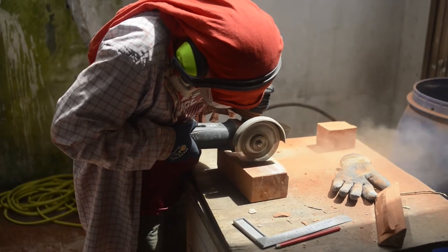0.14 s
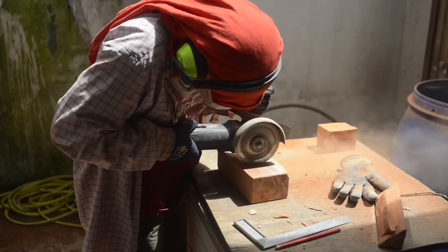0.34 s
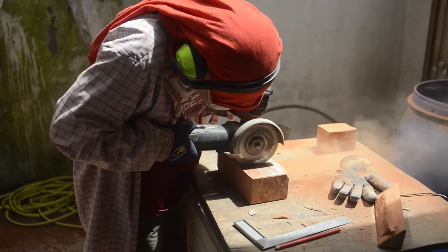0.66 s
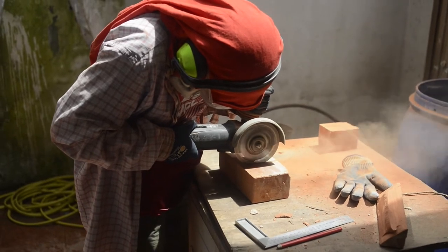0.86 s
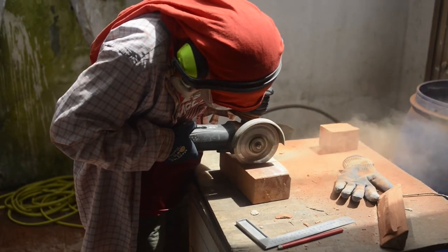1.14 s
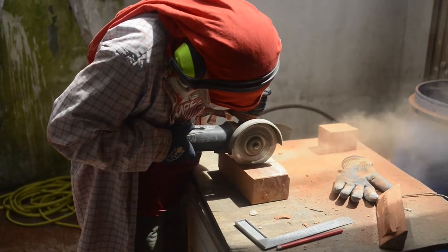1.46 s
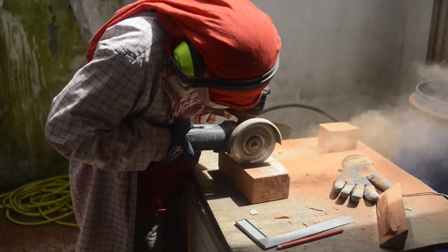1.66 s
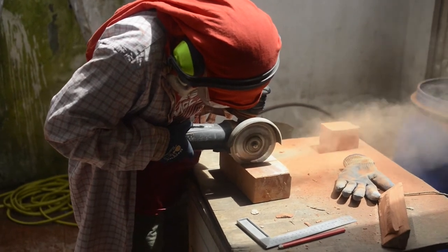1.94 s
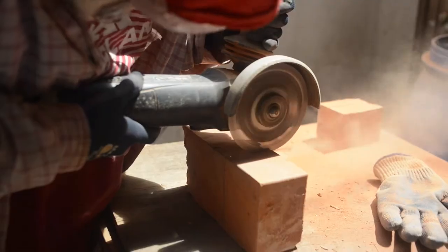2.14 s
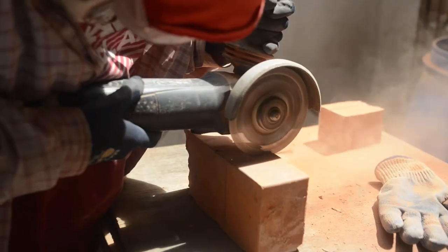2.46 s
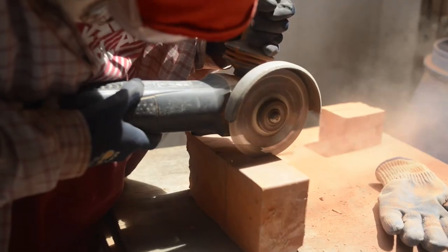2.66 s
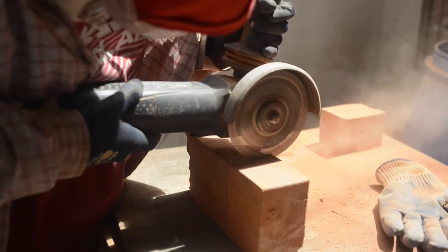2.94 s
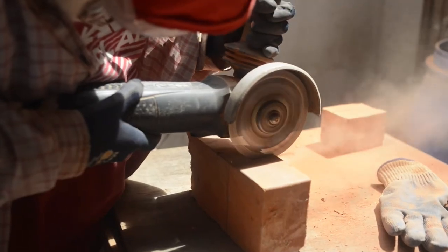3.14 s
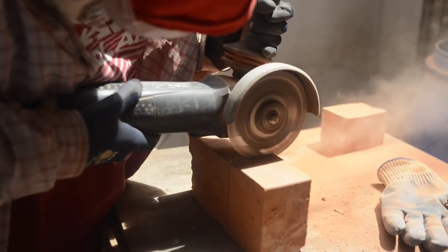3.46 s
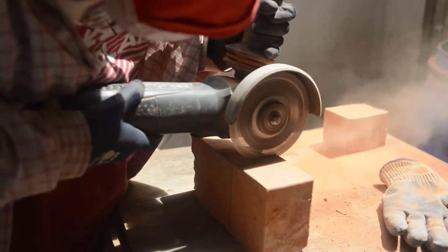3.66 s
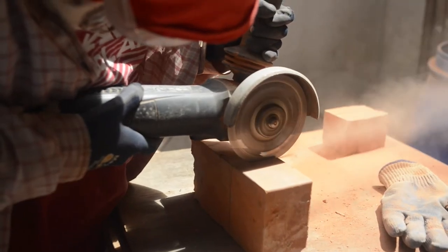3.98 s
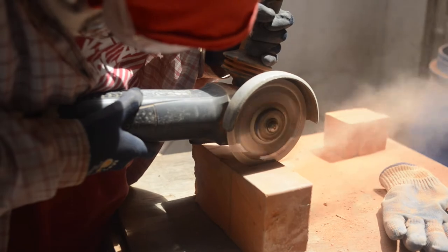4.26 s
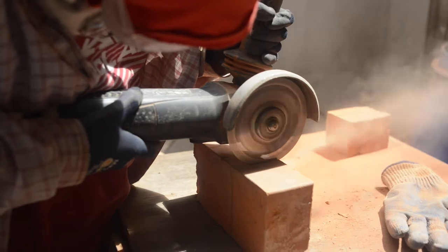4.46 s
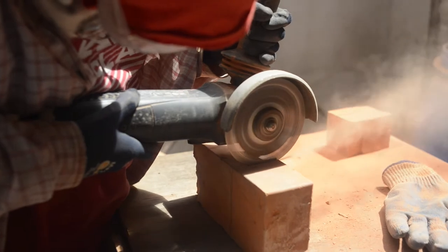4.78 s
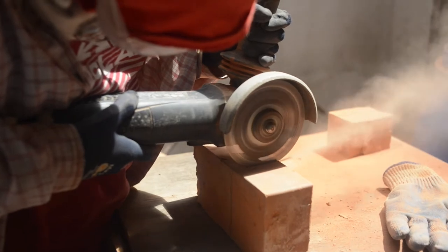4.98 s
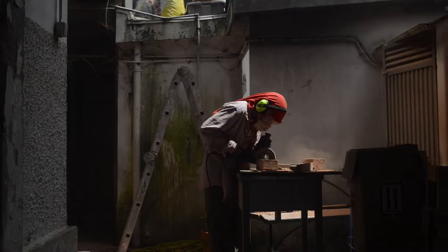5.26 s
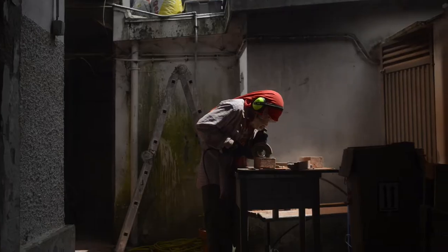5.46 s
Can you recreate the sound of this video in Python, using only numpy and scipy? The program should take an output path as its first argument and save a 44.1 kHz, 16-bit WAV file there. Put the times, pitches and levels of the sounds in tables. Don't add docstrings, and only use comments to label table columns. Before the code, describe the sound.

Continuous pulsing high screech of a spinning disc grinding into brick, dusty hiss around it, its tone changing abruptly at two scene cuts.

```python
import sys
import numpy as np
from scipy import signal
from scipy.fft import rfft, irfft
from scipy.io import wavfile
from scipy.ndimage import uniform_filter1d

SR = 44100
rng = np.random.default_rng(int(sys.argv[2]) if len(sys.argv) > 2 else 0)


def generate_wav(sig):
    pcm = np.round(np.clip(np.atleast_2d(sig).T, -1, 1) * 32767).astype(np.int16)
    wavfile.write(sys.argv[1], SR, pcm)


def elevation(decibels):
    levels = np.asarray(decibels, float)
    return 10 ** (levels / 20)


N = 247779

MOVES_S = (2.104, 5.143)
SPINDLE_HZ, MAINS_HZ = 145.33, 50

MODE_HZ = [3420, 3760, 3905, 4500, 5240, 5360, 5860, 6110, 6210, 6760, 7020, 7260, 7460, 7600, 7975, 8030,
           8185, 9130, 9435, 10660, 11300, 12020, 12750, 13100, 13380, 14080, 14600, 15400]
MODE_WIDTH_HZ = [177, 72, 45, 89, 70, 71, 60, 80, 68.6, 33.4, 35, 130, 80, 70, 45.4, 50, 52, 45, 39.7, 254,
                 230, 90, 169, 55, 90, 79, 110, 60]
# beside_db, close_db, far_db [dB]
MODE_DB = [(4.5, -1.5, 2), (-5, 6, -7), (-1, -6, -1), (2.5, 7, 6), (-8, 1.5, -1), (4.5, 7, 4), (0, 0, 4),
           (3, -11, 2), (7.5, 11, 0), (4, 12, 3), (2, 3, -6), (1, -4, -11), (-4, -1, -6), (-13, -11, -10),
           (0, 9.5, 3), (0.5, 1, -9), (5, 10.5, 2), (-7, -8, -11), (11, 8, 2), (-4, -7.5, -16),
           (-3.5, -8.5, -10), (-7, -7.5, -7), (-10, -12, -12), (-10, -14, -9), (-16, -17, -16),
           (-11, -11, -15), (-18, -18, -23), (-14, -12, -15)]
THIN_MODE, TOP_MODE = 9, 18
# pitch_hz [Hz], level_db [dB per Hz]
DUST_SPECTRA = [
    [(1400, -48), (2650, -20), (2800, -5), (3360, -7.5), (4090, -9.5), (4300, -9), (4930, -13), (6000, -4),
     (8740, -7), (9980, -9), (11100, -18), (11800, -17), (13600, -22), (15600, -25)],
    [(1410, -41.5), (2400, -10.5), (3280, -5.5), (3750, -0.5), (4190, -42), (4460, 2.5), (4930, -4),
     (6540, -1.5), (8210, -3), (8740, -23), (9750, -7), (9980, -11), (15600, -21)],
    [(1400, -51), (2400, -23), (3000, -10), (3600, -6), (4190, -16), (4900, -24), (6400, -11.5),
     (7500, -12), (8700, -17), (10000, -13.5), (12500, -28), (15600, -31)],
]
# pitch_hz [Hz], level_db [dB per Hz]
BODY_SPECTRA = [
    [(15, -71), (25, -45), (96, -26), (211, -34.5), (242, -13), (273, -21.5), (577, -14.5), (612, -13.5),
     (703, -13), (1020, -9), (2300, -7), (2800, -8.5), (3640, -18), (6160, -120)],
    [(15, -57), (25, -40), (191, -21.5), (464, -20), (589, -14), (1020, -13), (1200, -9.5), (1520, -9.5),
     (1960, -3.5), (2490, -8), (2640, -3), (2800, -15.5), (3640, -23), (6160, -120)],
    [(15, -82), (25, -52), (108, -39.5), (134, -31), (464, -21.5), (589, -12), (731, -13), (964, -9.5),
     (1300, -7.5), (1460, -7), (1890, -8.5), (2800, -4.5), (3640, -26), (6160, -120)],
]
# pitch_hz [Hz], level_db [dB per Hz]
BENCH_SPECTRUM = [(30, -21), (60, -5), (110, -2.5), (250, 0), (480, -0.5), (900, -21), (2000, -61)]
# pitch_hz [Hz], level_db [dB]
MACHINE_TONES = [
    [(247.6, -77.5), (581.4, -73.5), (726.7, -71), (872.1, -74), (1017, -69.5), (1163, -72.5), (1502, -69),
     (1884, -65), (2164, -66), (2466, -92), (2649, -69), (2902, -57), (3047, -54), (3327, -58), (3472, -76),
     (3747, -58.5)],
    [(581.4, -75.5), (726.7, -74), (1507, -69.5), (2008, -68.5), (2169, -75), (2616, -61.5), (2751, -79),
     (2907, -69), (3052, -64), (3488, -56), (3623, -61), (3768, -73)],
    [(145.3, -82.5), (581, -72), (1502, -66), (2008, -65.5), (2320, -65), (2616, -60.5), (2762, -61),
     (2907, -61), (3198, -69), (3343, -70)],
]
# start_s [s], lift_db [dB]
HARD_LUMPS = [(0.601, 7.5), (0.6719, 4), (.85, 7), (1.2296, 4.5), (1.3164, 7), (1.5783, 8), (1.99, 0),
              (2.1261, 4.5), (2.386, 9), (2.542, 9), (2.6519, 8), (2.7927, 10), (2.8769, 6), (3.0285, 5.5),
              (3.1164, 7.5), (3.2221, 3), (3.301, 7), (3.3856, 8.5), (3.4486, 7), (3.7559, 1), (3.8192, 7),
              (4.0346, 6.5), (4.127, 8.5), (4.5022, 0), (4.5695, 3.5), (4.657, 6), (4.7765, 2.5), (4.89, 3),
              (5.0574, 6.5), (5.128, 7)]
# start_s [s], level_db [dB]
FEED = [(0, -1), (.08, -0.5), (.62, 0), (1.45, 0), (1.6, 0), (2.09, 1), (2.115, -4.5), (2.3, -1),
        (2.45, -1), (2.8, 0.5), (3.15, -0.9), (3.4, 0.3), (3.9, 0.2), (4.45, -0.5), (4.63, 1.5),
        (4.8, -0.5), (4.93, 0.5), (5.03, -1.5)]
# pitch_hz [Hz], level_db [dB]
GUARD_TONES = [(3478, 1.5), (3768, -3.5), (4495, 0.5)]

# level in dB at mid stay, and its creep in dB per s as the groove deepens
CUT_DB, CUT_CREEP = (-34.5, -34, -39), (0.01, 0.01, -1)
BODY_DB, BODY_CREEP = (-52, -49, -51), (-0.16, -0.32, 1.5)
THIN_DB, THIN_CREEP = (-46, -40.5, -48), (-2.2, 1.9, -8.0)
TOP_DB, TOP_CREEP = (-39.3, -43, -49.5), (-0.075, 0.71, -10)
DUST_DB = (-4.5, -7, -3)
BENCH_DB = (-71.5, -71.5, -86)
DRYNESS = (1, 1, .5)
BODY_FOLLOW, THIN_FOLLOW, TOP_FOLLOW = 0.93, 0.91, 0.74
SWELL_DB, SWELL_HZ = 2, 10.5

LUMP_S, DRAG_S, DRAG_SHARE = .0075, 0.019, 0.2
YARD_T60_S, YARD_DB = .16, -11

ROCK_HZ, ROCK_PEAK_S, ROCK_DB, RIM_LAG_S = 5.23, 5.33, 1.5, 0.023
TURN_AT_S, TURN_S = 5.4, 0.018
GEAR_DB, GEAR_ROCK, GEAR_DROP_DB = -39, 2.1, -9
GUARD_DB, GUARD_ROCK, GUARD_RISE_DB = -54.5, 2.2, 9.5


def shape(x, gain):
    size = 1 << 14
    hz = np.arange(size // 2 + 1) * SR / size
    cepstrum = irfft(np.log(gain(hz) + 1e-9), size)
    cepstrum[1:size // 2] *= 2
    cepstrum[size // 2 + 1:] = 0
    impulse = irfft(np.exp(rfft(cepstrum)), size)
    y = signal.fftconvolve(x, impulse)[:len(x)]
    return y / np.std(y)


def colour(x, points):
    hz, db = np.transpose(points)
    return shape(x, lambda f: elevation(np.interp(np.log(f + 1), np.log(hz), db)))


def walk(rate_hz, size=N):
    hold = int(SR / rate_hz)
    steps = np.repeat(rng.standard_normal(size // hold + 2), hold)
    return 1.3 * uniform_filter1d(uniform_filter1d(steps, hold), hold)[:size]


def bite(turn):
    torque = 2 * np.pi * 2 * MAINS_HZ * np.arange(N) / SR
    spots_db = 6 * np.exp(-(turn / np.pi % 1) / .3) + .6 * np.cos(turn)
    beat_db = 1.74 * np.cos(turn - torque) + 0.29 * np.cos(torque)
    hands_db = .5 * walk(12) + 0.69 * walk(40)
    return spots_db + beat_db + hands_db


def grit(spread_db, press_db):
    size_db = spread_db * np.minimum(rng.exponential(size=len(press_db)), 6)
    return rng.standard_normal(len(press_db)) * elevation(size_db + press_db)


def rings(modes):
    def gain(f):
        power = sum(elevation(2 * db) / (1 + (2 * (f - hz) / max(width, 4)) ** 2) for hz, width, db in modes)
        return f / np.hypot(f, 3000) * np.sqrt(power)
    return gain


def disc(press_db, place, thin_db, top_db):
    modes = list(zip(MODE_HZ, MODE_WIDTH_HZ, np.transpose(MODE_DB)[place]))
    rest = [mode for k, mode in enumerate(modes) if k not in (THIN_MODE, TOP_MODE)]
    ring = shape(grit(3.36, press_db), rings(rest))
    thin = elevation(thin_db) * shape(grit(2.6, .5 * press_db), rings([modes[THIN_MODE]]))
    top = elevation(top_db) * shape(grit(2.6, .5 * press_db), rings([modes[TOP_MODE]]))
    return ring, thin + top


def dust(press_db, place):
    return elevation(DUST_DB[place]) * colour(grit(1.95, 0.44 * press_db), DUST_SPECTRA[place])


def yard(x):
    t = np.arange(int(YARD_T60_S * SR)) / SR
    echoes = rng.standard_normal(len(t)) * elevation(-60 * t / YARD_T60_S) * (t > .003)
    echoes = elevation(YARD_DB) * echoes / np.sqrt(np.sum(echoes ** 2))
    echoes[0] = 1
    return signal.fftconvolve(x, echoes)[:len(x)] / np.sqrt(np.sum(echoes ** 2))


def body(press_db, place):
    return colour(grit(2.53, 0.48 * press_db), BODY_SPECTRA[place])


def bench(press_db, place):
    size = len(press_db)
    shudder_db = 1.3 * uniform_filter1d(press_db, size=300) + 1.8 * walk(40.2, size)
    level_db = BENCH_DB[place] + shudder_db - shudder_db.mean()
    return elevation(level_db) * colour(rng.standard_normal(size), BENCH_SPECTRUM)


def whine(tones, motor_s, flutter_db):
    out = 0
    for hz, db in tones:
        level = elevation(db + flutter_db * walk(24, size=len(motor_s)))
        out = out + level * np.sin(2 * np.pi * (hz * motor_s + rng.random()))
    return np.sqrt(2) * out


def lumps():
    kick = np.zeros(N)
    start_s, lift_db = np.transpose(HARD_LUMPS)
    kick[(start_s * SR).astype(int)] = lift_db
    t = np.arange(SR // 10) / SR
    relax = (1 - DRAG_SHARE) * np.exp(-t / LUMP_S) + DRAG_SHARE * np.exp(-t / DRAG_S)
    return signal.fftconvolve(kick, relax)[:N]


def rock(t, lag_s=0):
    return ROCK_DB * np.cos(2 * np.pi * ROCK_HZ * (t - ROCK_PEAK_S - lag_s))


def turning_housing(t, motor_s):
    turned = .5 + .5 * np.tanh((t - TURN_AT_S) / TURN_S)
    gear_db = GEAR_DB + GEAR_ROCK * rock(t) + GEAR_DROP_DB * turned
    guard_db = GUARD_DB + GUARD_ROCK * rock(t) + GUARD_RISE_DB * turned
    gear = elevation(gear_db) * whine([(3052, 0)], motor_s, flutter_db=.6)
    guard = elevation(guard_db) * whine(GUARD_TONES, motor_s, flutter_db=3.5)
    return gear + guard


def scene():
    motor_s = np.cumsum(1 + 0.001508 * walk(6)) / SR
    bite_db = bite(2 * np.pi * SPINDLE_HZ * motor_s) + lumps()
    edges = [0] + [int(s * SR) for s in MOVES_S] + [N]
    parts = []
    for k in range(len(CUT_DB)):
        lead = max(edges[k] - 2048, 0)
        span = slice(lead, edges[k + 1])
        t = np.arange(lead, edges[k + 1]) / SR
        since = t - t.mean()
        far = k == len(MOVES_S)
        press_db = DRYNESS[k] * bite_db[span]
        feed_db = rock(t, RIM_LAG_S) if far else np.interp(t, *np.transpose(FEED))

        thin_db = THIN_DB[k] + THIN_CREEP[k] * since + THIN_FOLLOW * feed_db
        thin_db = thin_db + SWELL_DB * walk(SWELL_HZ, size=len(t))
        top_db = TOP_DB[k] + TOP_CREEP[k] * since + TOP_FOLLOW * feed_db
        top_db = top_db + SWELL_DB * walk(SWELL_HZ, size=len(t))
        ring, singing = disc(press_db, k, thin_db, top_db)

        cut_db = CUT_DB[k] + CUT_CREEP[k] * since + feed_db
        body_db = BODY_DB[k] + BODY_CREEP[k] * since + BODY_FOLLOW * DRYNESS[k] * feed_db
        heard = elevation(cut_db) * yard(ring + dust(press_db, k)) + singing
        heard = heard + elevation(body_db) * body(press_db, k)
        heard = heard + bench(press_db, k)
        heard = heard + whine(MACHINE_TONES[k], motor_s[span], flutter_db=3.2)
        if far:
            heard = heard + turning_housing(t, motor_s[span])
        parts.append(heard[edges[k] - lead:])
    return np.array([np.concatenate(parts)] * 2)


def band_limit(x):
    return signal.sosfilt(signal.butter(12, 16250, fs=SR, output="sos"), x)


def record(dry):
    soft = .12 * np.tanh(dry / .12)
    soft = soft - 0.74 * soft ** 2
    low_cut = signal.butter(2, 70, "high", fs=SR, output="sos")
    top_cut = signal.ellip(12, .2, 70, 15720, fs=SR, output="sos")
    mix = signal.sosfilt(top_cut, signal.sosfilt(low_cut, soft))
    return band_limit(mix)


dry = scene()
out = record(dry)
generate_wav(out)
```